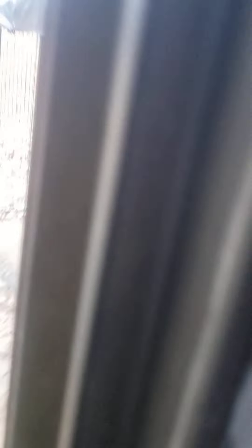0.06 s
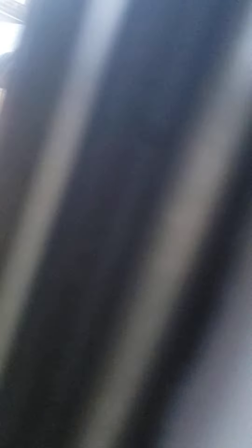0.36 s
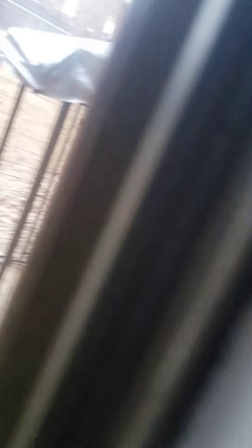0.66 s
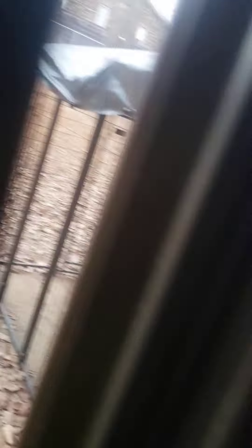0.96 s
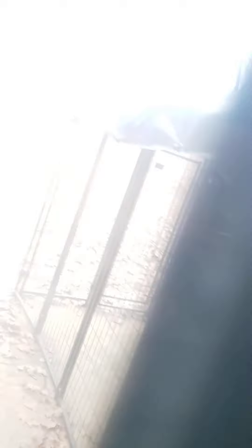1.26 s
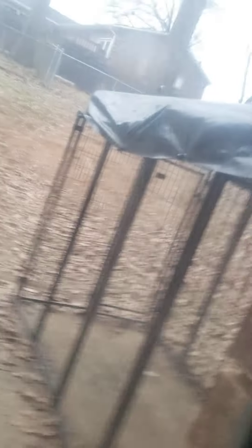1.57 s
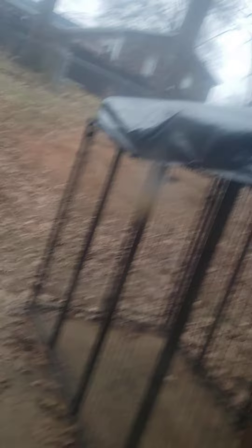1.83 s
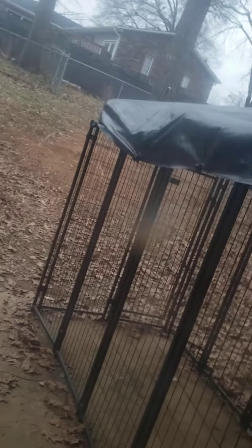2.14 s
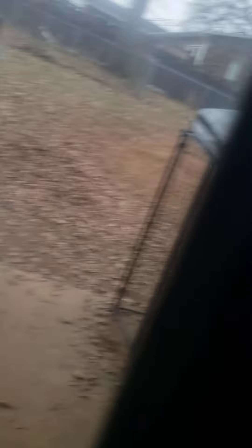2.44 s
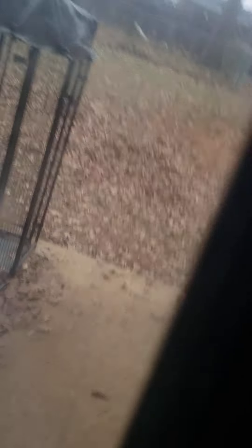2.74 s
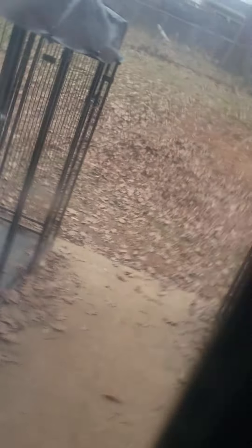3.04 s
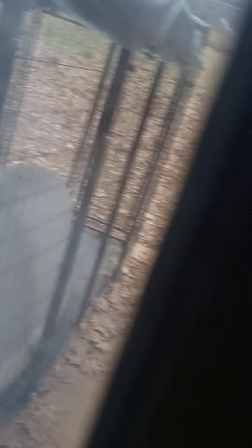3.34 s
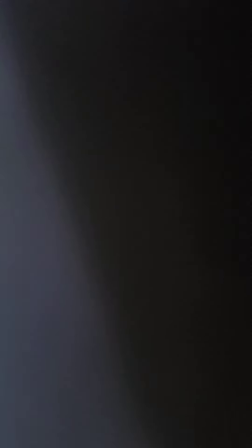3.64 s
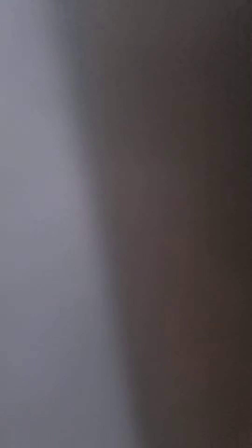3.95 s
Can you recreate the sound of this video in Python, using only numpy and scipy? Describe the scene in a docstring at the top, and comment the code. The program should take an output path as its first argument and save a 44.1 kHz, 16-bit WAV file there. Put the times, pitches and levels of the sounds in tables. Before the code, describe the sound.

Close door handling, with light blind ticks, then scraping, brief squeaks and several sharp clacks.

```python
"""A door clacks, rattles, scrapes and groans, handled right beside a hand-held microphone. Hard impacts give a
broadband crack, then the frame booms, its low frequencies dying last. Before and between the clacks, the slats
of the door's blind tick and soft bumps ring damped modes. Stick-slip friction squeaks and whistles, loose metal
clinks, and surfaces sliding past the microphone rasp and hiss. The doorway adds a short reverberation to the
knocks and whistles."""
import sys
import numpy as np
from scipy import signal
from scipy.fft import rfft, irfft, next_fast_len
from scipy.io import wavfile
from scipy.ndimage import uniform_filter1d, map_coordinates

SR = 44100
rng = np.random.default_rng(int(sys.argv[2]) if len(sys.argv) > 2 else 0)


def transcribe(signal):
    """Save signal, clipped to [-1, 1], as a 16-bit WAV file at the path in sys.argv[1]."""
    frames = np.atleast_2d(signal).T
    limited = np.clip(frames, -1, 1)
    pcm = np.round(limited * 32767).astype(np.int16)
    wavfile.write(sys.argv[1], SR, pcm)


N = 176400
T = np.arange(N) / SR

# spectrum of a hard contact: f/Hz, level/dB
CONTACT_SPECTRUM = [(150, -6), (480, 5), (2400, -1.5), (4600, 1.5), (12000, -1.5)]
# spectrum of the door leaf: f/Hz, level/dB
LEAF_SPECTRUM = [(300, -3), (780, -0.5), (1050, -4.5), (2400, -0.5), (5000, -6), (9000, -22.5)]
IMPACT_ATTACK_S, SLIP_ATTACK_S = 0.0004, 0.0027
CRACK_DB = -2.5  # an impact's first instant against its longer decay
DOOR_PAN_DB, BASS_PAN_DB = -3.5, 3  # left minus right


def clacks():
    """Impact excitation: a chattering crack, then a boom whose damping rises with frequency."""
    # hard knocks: t/s, level/dB, T60 of the chattering decay/s, boom level/dB
    knocks = [(1.897, -15, 0.14, -22), (2.9645, -16, 0.067, -22), (3.4723, -15, 0.036, -33),
              (3.567, -17, 0.086, -22.5)]
    # spectrum of the frame's boom: f/Hz, level/dB
    boom_spectrum = [(25, -17), (58, -2.5), (480, -10), (5000, -46)]
    # decay of the boom: f/Hz, T60/s
    boom_decay = [(60, 0.58), (2000, 0.18)]
    out, t = np.zeros((2, N)), T[:SR // 2]
    for s, db, t60, boom_db in knocks:
        chatter = unit(amp(2.8 * wobble(600)[:len(t)]))
        crack = amp(CRACK_DB) * struck(t, IMPACT_ATTACK_S, t60=0.026)
        force = chatter * struck(t, IMPACT_ATTACK_S, t60) + crack
        add(out, s, amp(db) * pan(DOOR_PAN_DB) * force * noise(CONTACT_SPECTRUM, size=len(t)))
        boom = damped(noise(boom_spectrum, size=len(t)), boom_decay)[:, :len(t)]
        rise = 1 - np.exp(-t / 0.0034)
        add(out, s, amp(boom_db) * pan(BASS_PAN_DB) * rise * boom)
    return out


def rattles():
    """Intermittent contact: the door leaf jolts and catches in dull, chattering bursts."""
    # jolts of the leaf: t/s, level/dB
    jolts = [(1.911, -31.5), (1.929, -30.5), (1.971, -29), (2.287, -30.5), (2.455, -29.5)]
    out, t = np.zeros((2, N)), T[:SR // 5]
    for s, db in jolts:
        chatter = unit(amp(5 * wobble(500)[:len(t)]))
        force = chatter * struck(t, IMPACT_ATTACK_S, t60=0.1)
        add(out, s, amp(db) * pan(DOOR_PAN_DB) * force * noise(LEAF_SPECTRUM, size=len(t)))
    return out


def groans():
    """Random modulation: the moving door judders in low tones, rough in pitch and amplitude."""
    # judders: t/s, duration/s, f/Hz, level/dB
    judders = [(2.303, 0.041, 560, -38), (2.674, 0.106, 411.6, -44), (3.074, 0.054, 202.7, -36.5),
               (3.35, 0.094, 218.8, -38)]
    out = np.zeros((2, N))
    for s, length, hz, db in judders:
        wavering_hz = hz * (1 + 0.1574 * wobble(hz / 2))
        tone = unit(sine(wavering_hz) * amp(3 * wobble(90)))
        out += amp(db) * held(s, length, attack_s=0.01, release_s=0.08) * tone
    return out


def sliding():
    """Friction noise: rough surfaces rasp, grind and hiss over the door's drone and the hand's rumble."""
    # envelope of the sliding contact: t/s, level/dB
    rasp_levels = [(0, -42), (.4, -60), (.98, -60.5), (1.14, -64.5), (1.5, -45), (1.72, -53), (1.85, -42.5),
                   (2.18, -46.5), (2.19, -37.5), (2.35, -28), (2.405, -34.5), (2.47, -27), (2.54, -34),
                   (2.63, -56.5), (2.7, -39), (2.94, -50), (2.98, -36.5), (3.6, -40.5), (3.68, -48)]
    # its spectrum: f/Hz, level/dB
    rasp_spectrum = [(2600, -11.5), (4000, -0.5), (7600, -1.5), (12000, -9)]
    # envelope of the fine hiss: t/s, level/dB
    hiss_levels = [(0, -45), (.35, -62), (1.15, -68), (1.23, -40), (1.72, -51.5), (1.78, -39),
                   (2.184, -41.5), (2.188, -26.5), (2.27, -36.5), (2.35, -33), (2.62, -49), (3.05, -37),
                   (3.58, -40), (3.7, -51.5), (3.8, -38)]
    # its spectrum: f/Hz, level/dB
    hiss_spectrum = [(5000, -12), (10000, -4.5)]
    # its direction: t/s, left minus right/dB
    hiss_pan = [(2.4, -1.5), (3.5, 3.5)]
    # envelope of the door body's drone: t/s, level/dB
    body_levels = [(1.1, -58.5), (2.15, -47), (2.4, -39), (2.65, -44.5), (3, -43), (3.58, -33.5),
                   (3.8, -55.5)]
    # its spectrum: f/Hz, level/dB
    body_spectrum = [(200, -3.5), (480, -6.5), (2500, -30)]
    # envelope of the hand's rumble: t/s, level/dB
    rumble_levels = [(0, -47), (1, -60), (2.1, -43.5), (2.93, -52.5), (3.04, -34), (3.27, -41.5),
                     (3.62, -36), (3.85, -61)]
    # its spectrum: f/Hz, level/dB
    rumble_spectrum = [(22, -23), (58, 1.5), (800, -42)]
    # spectrum of a thin, faint swish near 2.3 kHz, like a finger or fabric rubbing: f/Hz, level/dB
    swish_spectrum = [(1000, -24), (2300, 8.5), (3000, -8), (9000, -21)]
    rasp_pan_db, sway_db = -7, 1.8
    grit = unit(amp(0.88 * wobble(700) + wobble(45)))
    rasp_db = curve(rasp_levels)
    rasp = amp(rasp_db) * patchy(noise(rasp_spectrum)) * pan(rasp_pan_db)
    # the grind grows with pressure more steeply than the rasp
    grind_db = rasp_db.max() - 2 + 1.27 * (rasp_db - rasp_db.max())
    grind = amp(grind_db) * patchy(noise(LEAF_SPECTRUM)) * pan(rasp_pan_db / 2)
    hiss = amp(curve(hiss_levels)) * patchy(noise(hiss_spectrum)) * pan(curve(hiss_pan))
    body = amp(curve(body_levels) + sway_db * wobble(26.93)) * patchy(noise(body_spectrum))
    rumble_db = curve(rumble_levels) + sway_db * wobble(26)
    rumble = amp(rumble_db) * noise(rumble_spectrum) * pan(BASS_PAN_DB)
    swell = np.exp(-((T - 0.87) / 0.15) ** 2 / 2)
    swish = amp(-52.5) * swell * patchy(noise(swish_spectrum))
    return grit * (rasp + grind + hiss) + body + rumble + swish


def ticks():
    """Light impacts: slats touch in brief broadband clicks of differing brightness."""
    # slat contacts: t/s, level/dB, spectral tilt/(dB per octave)
    contacts = [(0.4226, -38, 0), (0.437, -37.5, -5), (0.457, -34, -3.5), (0.57, -38.5, -4.5),
                (0.622, -32.5, -4.5), (0.903, -41.5, 2.5), (1.065, -38.5, -5.5), (1.466, -22.5, 10.5),
                (2.093, -21.5, 10)]
    # spectrum of a slat: f/Hz, level/dB
    slat_spectrum = [(900, 6.5), (3200, 11.5), (12000, 3)]
    out, t = np.zeros((2, N)), T[:SR // 5]
    crack = amp(CRACK_DB) * struck(t, IMPACT_ATTACK_S, t60=0.0034)
    force = struck(t, IMPACT_ATTACK_S, t60=0.056) + crack
    for s, db, tilt_db in contacts:
        add(out, s, amp(db) * pan(-9.5) * force * noise(slat_spectrum, tilt_db, size=len(t)))
    return out


def bumps():
    """Modal ringing: soft knocks excite the microphone's damped body; softer contact sounds lower."""
    # soft knocks: t/s, peak level/dB, lowest mode f/Hz
    knocks = [(0.575, -32.5, 69), (.782, -30, 76.5), (1.066, -36, 115), (1.225, -36, 244),
              (1.367, -32, 107), (1.425, -12, 121.7), (1.4406, -25.5, 147), (1.971, -18.5, 60.5),
              (2.463, -24, 90), (3.619, -17, 49.5)]
    # body modes: ratio to the lowest, level/dB, T60/s when the lowest is at reference_hz
    modes = [(1, 3, 0.056), (1.8, -1.5, 0.06), (4, -5.5, 0.023), (11, -1, 0.0058)]
    reference_hz, rise_cycles = 127, 0.09
    out, t = np.zeros((2, N)), T[:SR // 5]
    for s, db, hz in knocks:
        ring = np.zeros(len(t))
        for ratio, mode_db, t60 in modes:
            mode_hz = hz * ratio * np.exp(rng.normal(0, 0.04))
            envelope = struck(t, rise_cycles / hz, t60 * np.sqrt(reference_hz / hz))
            ring += amp(mode_db) * envelope * np.cos(2 * np.pi * mode_hz * t)
        add(out, s, -amp(db) * pan(BASS_PAN_DB) * ring / np.abs(ring).max())
    return out


def squeaks():
    """Stick-slip oscillation: uneven slips give high, fluttering glides with a scratch in them."""
    # glides: t/s, duration/s, start f/Hz, end f/Hz, level/dB, left minus right/dB
    glides = [(1.585, 0.082, 11670, 12100, -32, -5.5), (1.987, 0.0023, 13840, 12500, -11, 7),
              (2.04, 0.012, 15100, 11900, -21, 8), (2.06, 0.021, 14000, 11850, -30, 20),
              (3.856, 0.057, 10530, 11260, -39.5, 7)]
    slips_per_wander = 4
    out = np.zeros((2, N))
    scratch = amp(-17) * noise(CONTACT_SPECTRUM)
    for s, length, start_hz, end_hz, db, pan_db in glides:
        wander = np.array([wobble(start_hz / slips_per_wander) for ear in range(2)])
        hz = np.interp(T, [s, s + length], [start_hz, end_hz]) * (1 + 0.058 * wander)
        tone = unit(sine(hz) * amp(2 * wobble(400)))
        envelope = held(s, length, SLIP_ATTACK_S, release_s=0.019)
        out += amp(db) * pan(pan_db) * envelope * (tone + scratch)
    return out


def clinks():
    """Free vibration: loose metal rings briefly, roughened by a random drift of phase."""
    # metal contacts: t/s, level/dB
    contacts = [(1.586, -30.5), (2.021, -21), (3.587, -22), (3.621, -23)]
    # modes of the metal: f/Hz, level/dB
    modes = [(4200, -1), (6500, -4)]
    out, t = np.zeros((2, N)), T[:SR // 5]
    for s, db in contacts:
        drift = np.cumsum(0.18 * rng.standard_normal((len(modes), 2, len(t))), axis=2)
        ring = sum(amp(mode_db) * np.sin(2 * np.pi * hz * t + phase)
                   for (hz, mode_db), phase in zip(modes, drift))
        add(out, s, amp(db) * struck(t, attack_s=0.00092, t60=0.041) * ring)
    return out


def whistles():
    """Nearly periodic stick-slip: a clean note that sags as the pressure goes."""
    # notes: t/s, duration/s, level/dB
    notes = [(1.591, 0.0657, -42.5), (3.739, 0.0038, -39.5)]
    pitch_hz, sag_hz_per_s, release_s = 2990, 16000, 0.07
    out = np.zeros(N)
    for s, length, db in notes:
        sag_hz = np.clip(T - s - length, 0, release_s) * sag_hz_per_s
        tone = sine(pitch_hz * (1 + 0.009 * wobble(400)) - sag_hz)
        out += amp(db) * held(s, length, SLIP_ATTACK_S, release_s) * tone
    return pan(5) * out


def doorway(x, t60):
    """Reverberation: convolution with an exponentially decaying noise tail."""
    t = T[:SR // 2]
    tail = rng.standard_normal((2, len(t))) * np.exp(-np.log(1000) * t / t60)
    return signal.fftconvolve(x, tail / np.linalg.norm(tail[0]), axes=1)[:, :N]


def noise(spectrum, tilt_db=0, size=N):
    """Spectral shaping: stereo noise of rms 1 heard through the port, tilted per octave above 500 Hz."""
    # likeness of left and right: f/Hz, correlation
    coherence = [(280, 0.7), (500, 0)]
    # notch and peak of the microphone's port: f/Hz, level/dB
    port_response = [(7800, -1.5), (9000, -8), (12000, 7), (16000, -2.5)]
    hz = np.fft.rfftfreq(size, 1 / SR)
    width = np.arccos(np.clip(along(coherence, hz), -1, 1)) / 2
    octaves = np.log2(np.maximum(hz, 500) / 500)
    gain = amp(along(spectrum, hz) + along(port_response, hz) + tilt_db * octaves)
    white = rfft(rng.standard_normal((2, size)))
    mid, side = irfft(white * gain * [np.cos(width), np.sin(width)], size)
    return unit(np.array([mid + side, mid - side]))


def patchy(x, depth_db=3):
    """Time-varying filtering: shifting contact points favour passing patches of frequency."""
    z = signal.stft(x, nperseg=1024)[2]
    bands = uniform_filter1d(rng.standard_normal(z.shape[1:]), size=5, axis=0)
    patches = uniform_filter1d(bands, size=7, axis=1)
    return unit(signal.istft(z * amp(depth_db * unit(patches)), nperseg=1024)[1][:, :N])


def damped(x, decay_times):
    """Frequency-dependent damping: each band of x fades with its own T60."""
    hz, t, z = signal.stft(x, SR, nperseg=256)
    fade = amp(-60 * t / along(decay_times, hz)[:, None])
    return signal.istft(z * fade, SR, nperseg=256)[1]


def struck(t, attack_s, t60):
    """Impact envelope: a quick rise and an exponential decay."""
    return (1 - np.exp(-t / attack_s)) * np.exp(-np.log(1000) * t / t60)


def held(s, length, attack_s, release_s):
    """Driven envelope: a linear rise, a hold, then a fall of 60 dB per release_s."""
    rise = np.clip((T - s) / attack_s, 0, 1)
    return rise * np.exp(-np.log(1000) * np.maximum(T - s - length, 0) / release_s)


def sine(hz):
    """A tone whose phase is the integral of its frequency."""
    return np.sin(2 * np.pi * np.cumsum(hz, axis=-1) / SR)


def wobble(rate):
    """Smooth random modulation, rate knots a second."""
    return map_coordinates(rng.standard_normal(int(N * rate / SR) + 4), [T * rate])


def pan(db):
    """Constant-power gains for a left-minus-right level difference."""
    gains = amp(np.array([db, -db]).reshape(2, -1) / 2)
    return gains / np.sqrt(np.mean(gains ** 2, axis=0))


def along(points, hz):
    """Interpolation of (f/Hz, value) points on a log frequency axis."""
    f, values = np.transpose(points)
    return np.interp(np.log(hz + 1), np.log(f + 1), values)


def curve(points):
    """Interpolation of (t/s, value) points at every sample."""
    return np.interp(T, *np.transpose(points))


def amp(db):
    """Decibels to amplitude ratio."""
    return 10 ** (np.asarray(db) / 20)


def unit(x):
    """Normalisation to rms 1."""
    return x / np.sqrt(np.mean(x ** 2) + 1e-20)


def add(out, s, x):
    """Superposition of x on out, starting at s seconds."""
    part = out[:, max(round(s * SR), 0):][:, :x.shape[-1]]
    part += x[..., :part.shape[1]]


def scene():
    """Superposition: knocks and whistles reverberate; the other sources arrive by the direct path only."""
    ringing = clacks() + rattles() + ticks() + bumps() + whistles()
    reverberation = amp(-8) * doorway(ringing, t60=0.24)
    return ringing + reverberation + clinks() + squeaks() + groans() + sliding()


def record(dry):
    """Band limiting: an ideal low-pass filter removes the highest treble."""
    cutoff_hz = 16000
    size = next_fast_len(N + SR // 2)
    passband = np.fft.rfftfreq(size, 1 / SR) < cutoff_hz
    return irfft(rfft(dry, size) * passband, size)[:, :N]


dry = scene()
out = record(dry)
transcribe(out)
```